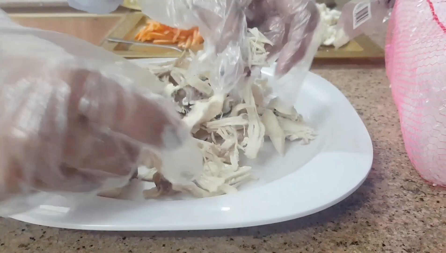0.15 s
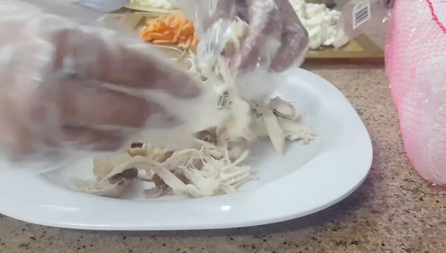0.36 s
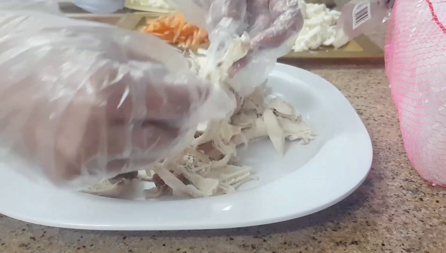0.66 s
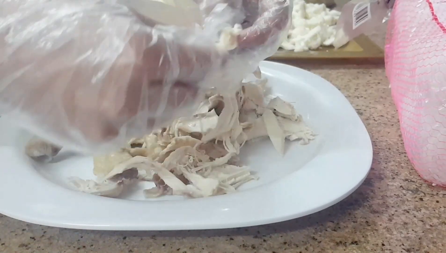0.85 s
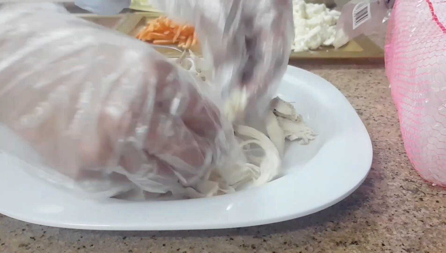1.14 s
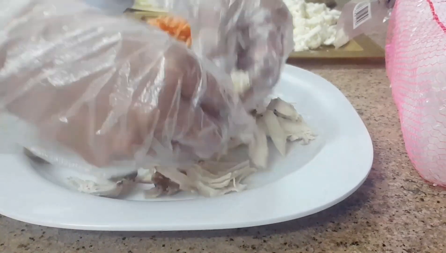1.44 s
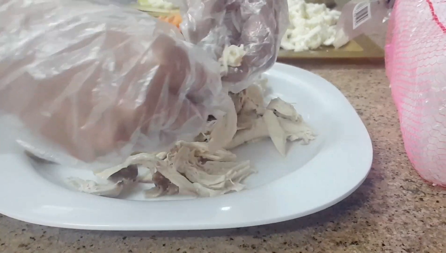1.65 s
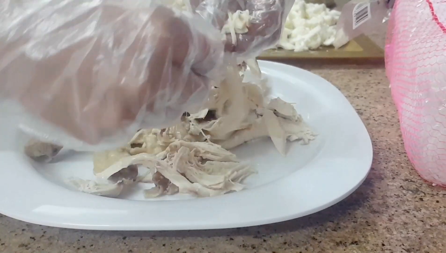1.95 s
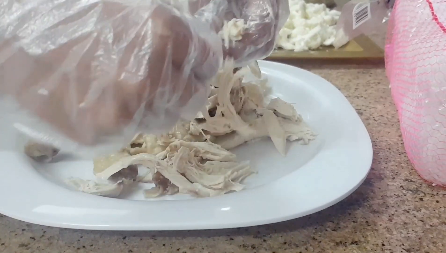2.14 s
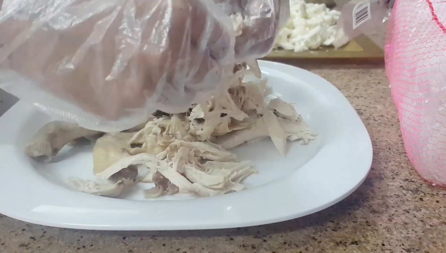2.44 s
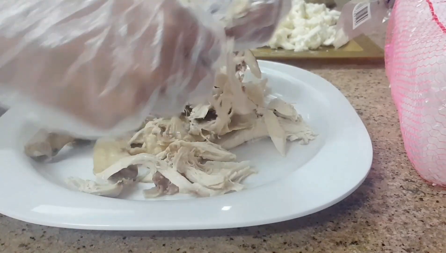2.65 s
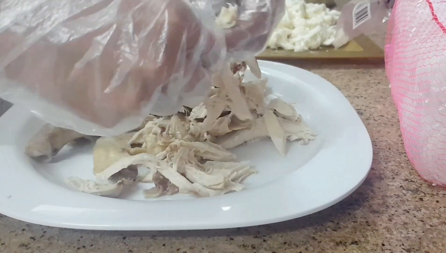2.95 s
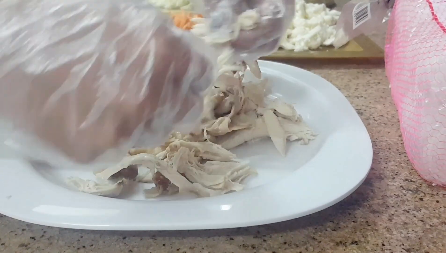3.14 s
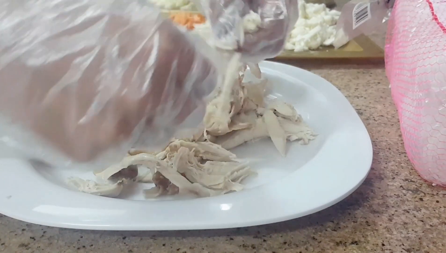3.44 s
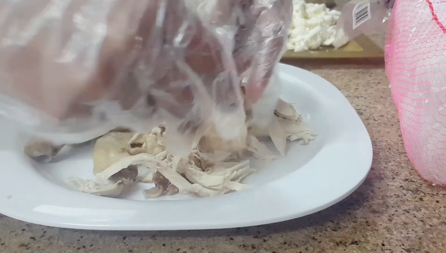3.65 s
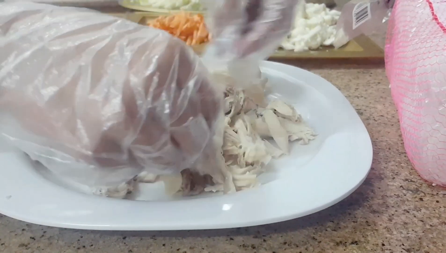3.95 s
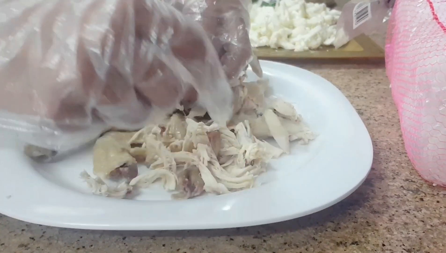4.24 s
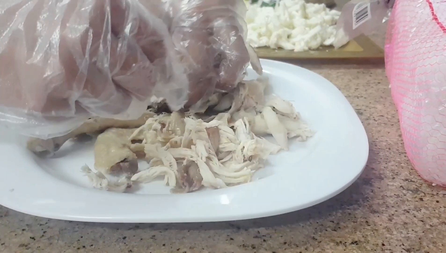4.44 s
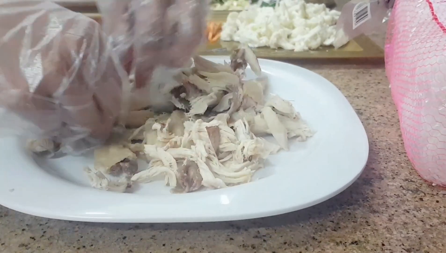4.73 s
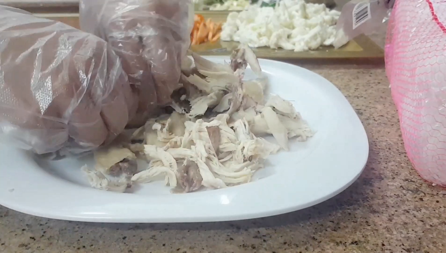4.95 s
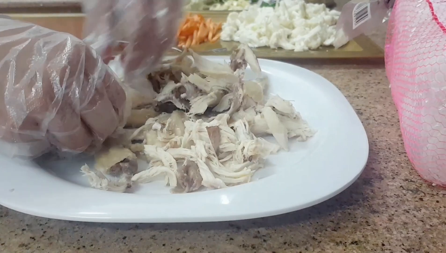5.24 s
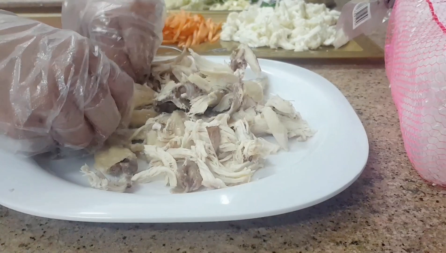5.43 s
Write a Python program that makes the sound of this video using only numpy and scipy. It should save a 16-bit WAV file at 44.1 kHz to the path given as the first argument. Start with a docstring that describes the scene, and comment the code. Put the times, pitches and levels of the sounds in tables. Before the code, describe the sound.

Close stereo pickup in a small hard-walled kitchen: thin plastic gloves crinkle almost continuously in uneven short pulls, with sharper crumples breaking out. Soft, dull rubbing of moist chicken fibres sits underneath. A steady low fridge hum and faint room air run throughout. Near four and a half seconds the dish is knocked, giving a quick cluster of clacks with a short ring, then crinkling continues.

```python
"""Gloved hands pulling cooked chicken apart

Thin plastic film buckles in swarms of tiny random clicks; sharper crumples are denser bursts of them.
Moist fibres rub on the film in duller grains, and a dish is knocked: short clacks and decaying modes.
A fridge hums as a sum of sines, its shaft harmonic beating with the mains; filtered noise is the room air.
Hard kitchen walls scatter every click and clack through decaying noise responses."""
import sys
import numpy as np
from scipy import signal
from scipy.fft import rfft, irfft
from scipy.io import wavfile
from scipy.ndimage import uniform_filter1d

SR = 44100
rng = np.random.default_rng(int(sys.argv[2]) if len(sys.argv) > 2 else 0)


def master_out(mix):
    """Clip the mix to full scale and print it as 16-bit PCM to the path in sys.argv[1]."""
    frames = np.transpose(np.atleast_2d(mix))
    ceiling = np.clip(frames, -1, 1)
    pcm = np.round(ceiling * 32767).astype(np.int16)
    wavfile.write(sys.argv[1], SR, pcm)


N = 246427
T = np.arange(N) / SR  # time [s]

# spectrum of the room air: (frequency [Hz], relative density [dB per Hz])
AIR_SPECTRUM = [(20, -37), (36, -32), (44, -3), (50, 3.5), (57, 0.5), (66, -1), (76, -12), (110, -8),
                (155, -4.5), (200, -13), (260, -15.5), (310, -23), (440, -21.5), (560, -40), (2000, -34.5),
                (15000, -33)]
# likeness of the air noise in the two channels: (frequency [Hz], coherence [0 to 1])
AIR_COHERENCE = [(60, 1), (130, 1), (290, 0.76), (640, 1), (1400, 0), (3000, 0)]
AIR_DB = -47.5  # mean level, before its slow wander

# harmonics of the compressor shaft: (multiple of shaft frequency, steady level [dB rms])
SHAFT_HARMONICS = [(1, -43.3), (2, -53), (3, -67), (5, -68), (6, -77), (7, -70)]
# magnetic buzz: (multiple of mains frequency, level [dB rms])
MAINS_HARMONICS = [(2, -54), (4, -61.5), (6, -69.5)]
# other faint machine tones: (frequency [Hz], level before waver [dB rms])
FAN_TONES = [(45.4, -59), (90.7, -70), (134.3, -57), (206.1, -71.5), (427, -76.5), (721, -85.5)]
SHAFT_HZ, MAINS_HZ = 59.3, 60
BEAT_NULL_S = 0.17  # shaft and mains sines oppose each other here
# the shaft hum is nearly steady; bass air noise close to its pitch makes it seem to waver.
# this chance interplay is drawn as a level curve: a slight random part and one brief cancellation
INTERPLAY_DB, INTERPLAY_PER_S = 0.2, 3.57
CANCEL_S, CANCEL_WIDTH_S, CANCEL_DB = 5.17, 0.044, -12

# a dish slides, bumps and settles: (time [s], relative level [dB], decay constant of the contact [s])
DISH_CONTACTS = [(4.562, -51.5, 0.032), (4.5806, -36, 0.0055), (4.586, -46, 0.0084), (4.607, -45, 0.0055),
                 (4.620, -46, 0.011)]
# resonances of the dish: (frequency [Hz], relative level [dB], t60 [s])
DISH_MODES = [(1024, -8, .2), (1110, -9, 0.17), (1340, -11, 0.18), (1430, -5, .2), (1505, -6, 0.16),
              (1580, -2, 0.21), (1500, -6, 0.24), (2270, -4, .18), (2640, -11, .15), (2600, -14, 0.096),
              (5240, 1, 0.083)]
# spectrum of the contact noise: (frequency [Hz], relative density [dB per Hz])
CONTACT_SPECTRUM = [(200, -17.5), (450, 2.5), (620, -11.5), (1000, -1.5), (1500, 0), (2200, 3.5),
                    (3000, -8), (4400, -4.5), (5500, -4), (9000, -15.5), (15000, -18)]

# spectrum of fibres rubbing on film: (frequency [Hz], relative density [dB per Hz])
RUB_SPECTRUM = [(200, -12), (350, -1.5), (460, 1), (570, -8.5), (850, -8), (1000, 2), (1180, -4.5),
                (1500, -6.5), (1800, -7), (2400, -4.5), (4000, -27)]
# spectrum of the buckling film: (frequency [Hz], relative density [dB per Hz])
FILM_SPECTRUM = [(300, -42.5), (700, -14.5), (1850, -11.5), (2200, -1.5), (2900, -0.5), (3800, -1.25),
                 (5400, 0), (7400, -1), (8400, 1), (9600, -0.9), (11000, -0.6), (12500, -4.5), (13800, -5),
                 (15000, -14.5)]
# sudden crumples of the film: (time [s], relative level [dB], decay constant [s])
CRUMPLE_EVENTS = [(0.308, -45, 0.014), (0.601, -38, .012), (0.748, -42, .013), (.817, -36, 0.011),
                  (1.057, -35.5, .018), (1.318, -44, 0.022), (1.401, -38.5, 0.022), (1.661, -37, .013),
                  (1.973, -38.5, 0.013), (2.126, -40.5, 0.02), (2.656, -32.5, 0.012), (2.703, -42, .013),
                  (2.782, -42.5, 0.022), (2.962, -36, 0.011), (3.202, -39.5, 0.019), (3.531, -38, 0.021),
                  (4.096, -42, 0.025), (4.583, -40.5, 0.025), (5.067, -41, 0.017)]
CRUMPLE_RUB_DB = -15  # the meat gives a little under each crumple
# pulls of the fingers: (start time [s], length before release [s], relative crinkle level [dB],
# duller rubbing relative to that crinkle level [dB])
FINGER_PULLS = [(-.05, 0.049, -48, -6), (0.043, 0.34, -49, -11.5), (0.272, 0.19, -49, -12.5),
                (0.459, .115, -48, -10), (0.545, 0.08, -41, -14), (0.678, 0.18, -43, -12),
                (0.867, 0.044, -50.5, -9), (0.952, .05, -48, -12.5), (1.018, 0.16, -47.5, -13.5),
                (1.228, 0.24, -56.5, -7), (1.41, 0.15, -43, -12.5), (1.58, 0.21, -47.7, -15),
                (1.817, .16, -51, -14), (2.044, 0.081, -52, -16), (2.2, .155, -53.5, -12.5),
                (2.378, 0.082, -51.5, -17), (2.531, 0.09, -50, -20), (2.663, .15, -47.5, -12.5),
                (2.872, 0.2, -51, -16), (3.121, .11, -48, -10), (3.247, 0.11, -50, -12.5),
                (3.429, 0.23, -49, -15.5), (3.722, 0.15, -45.5, -15), (3.894, 0.15, -52, -14),
                (4.059, 0.11, -45, -13.5), (4.185, 0.089, -49, -9.5), (4.265, 0.16, -46, -11.5),
                (4.463, .39, -52, -13), (4.86, 0.24, -47, -12), (5.113, .05, -52, -8.5),
                (5.156, 0.14, -49, -12), (5.366, .2, -49, -9.5)]
# every pull tightens, holds while the fibres give way, then slackens
ATTACK_S, SAG_DB_PER_S, RELEASE_S = 0.049, 3, 0.05
GRIP_SLIP_DB, GRIP_SLIP_PER_S = 0.5, 30  # the fingers catch and slip within a pull

# the two microphones differ in colour: (frequency [Hz], left minus right [dB])
MICROPHONE_DIFFERENCE = [(60, -0.5), (120, 0.1), (200, -4), (400, 0), (700, 7.5), (1250, -4), (2300, 2),
                         (4200, -0.8), (8000, -2.5), (14000, 0)]
TOP_HZ = 15250  # edge of the final low-pass


def undb(db):
    """Definition of the decibel: amplitude gain is ten to the power dB / 20."""
    return 10 ** (np.asarray(db) / 20)


def to_db(gain):
    """Inverse of the decibel law, with a small floor to keep the logarithm finite."""
    return 20 * np.log10(gain + 1e-9)


def unit(x):
    """Normalisation: division by the root mean square gives rms 1."""
    return x / np.sqrt(np.mean(x ** 2))


def on_log_axis(points, size):
    """Interpolation over log frequency: (Hz, value) points read at the bins of a transform."""
    hz, value = np.transpose(points)
    bin_hz = np.arange(size // 2 + 1) * SR / size
    return np.interp(np.log(bin_hz + 1), np.log(hz), value)


def colour(x, points):
    """Minimum-phase filtering: folding the cepstrum makes a causal response of the given (Hz, dB) shape."""
    cepstrum = irfft(np.log(undb(on_log_axis(points, size=16384))))
    half = len(cepstrum) // 2
    cepstrum[1:half] *= 2
    cepstrum[half + 1:] = 0
    response = irfft(np.exp(rfft(cepstrum)))[:half]
    return signal.fftconvolve(x, response)[:N]


def walk(rate):
    """Slow random modulation: held random values, smoothed twice, with rms 1."""
    hold = max(int(SR / rate), 1)
    held = np.repeat(rng.standard_normal(N // hold + 1), hold)
    smooth = uniform_filter1d(uniform_filter1d(held, hold), hold)
    return unit(smooth[:N])


def clicks(per_s, spread_db):
    """Random impulse train: mostly small clicks and a few large, scaled to rms 1 whatever their rate."""
    share = np.clip(per_s / SR, 1e-4, 1)  # chance of a click at each sample
    size = undb(spread_db * np.minimum(rng.exponential(size=N), 5))
    sign = rng.choice([-1, 1], N)
    struck = rng.random(N) < share
    return unit(struck * size * sign / np.sqrt(share))


def kitchen(x, direct_db, near_s, tail_db, t60_s):
    """Room response: direct sound, quick reflections off plate and counter, and the ring of the walls."""
    t = T[:SR // 2]
    channels = []
    for lag in (0, 4):  # delay of the direct sound [samples], left and right
        near = rng.standard_normal(len(t)) * np.exp(-t / near_s)
        decay = np.exp(-np.log(1000) * t / t60_s)
        build_up = 1 - np.exp(-t / 0.004)
        tail = rng.standard_normal(len(t)) * decay * build_up
        response = near / np.linalg.norm(near) + undb(tail_db) * tail / np.linalg.norm(tail)
        response[lag] += undb(direct_db)
        # reflections arrive from all sides, so no broad band is favoured
        spectrum = rfft(response)
        spectrum /= np.sqrt(uniform_filter1d(np.abs(spectrum) ** 2, size=200))
        channels.append(signal.fftconvolve(x, irfft(spectrum))[:N])
    return np.array(channels)


def pan(x, db):
    """Interchannel level difference: the left is raised over the right by db."""
    return x * undb(np.array([[db], [-db]]) / 2)


def air():
    """Partly coherent noise: rumble of moving air and a faint hiss, the bass alike in both channels."""
    mid = rfft(colour(rng.standard_normal(N), AIR_SPECTRUM))
    side = rfft(colour(rng.standard_normal(N), AIR_SPECTRUM))
    coherence = np.clip(on_log_axis(AIR_COHERENCE, size=N), 0, 1)
    mid = irfft(mid * np.sqrt(1 + coherence), N)
    side = irfft(side * np.sqrt(1 - coherence), N)
    noise = unit(np.array([mid + side, mid - side]))
    return pan(noise, db=-1.4) * undb(AIR_DB + 0.54 * walk(2.83))


def fridge(fan_waver_db=2.0):
    """Beating: the motor slips just behind the mains, so its second harmonic beats with the magnetic buzz."""
    turn = 2 * np.pi * (T - BEAT_NULL_S)
    cancel_db = CANCEL_DB * np.exp(-((T - CANCEL_S) / CANCEL_WIDTH_S) ** 2)
    interplay = undb(INTERPLAY_DB * walk(INTERPLAY_PER_S) + cancel_db)
    shaft = sum(undb(db) * np.sin(k * SHAFT_HZ * turn) for k, db in SHAFT_HARMONICS) * interplay
    buzz = -sum(undb(db) * np.sin(k * MAINS_HZ * turn) for k, db in MAINS_HARMONICS)
    fan = 0
    for hz, db in FAN_TONES:
        level = undb(db + fan_waver_db * walk(3.15))
        fan = fan + level * np.sin(hz * turn + 0.47 * walk(4.6))
    return pan(np.sqrt(2) * (shaft + buzz + fan), db=0.6)  # root 2 turns rms into peak


def dish(ring_db=-3.5, rise_s=0.0008):
    """Modal excitation: each contact gives a short clack that echoes round the kitchen, and rings the dish."""
    t = T[:SR // 2]
    clack, ring = np.zeros(N), np.zeros((2, N))
    noise = unit(colour(rng.standard_normal(N), CONTACT_SPECTRUM))
    for start, db, length in DISH_CONTACTS:
        first = int(start * SR)
        span = slice(first, first + len(t))
        push = undb(db) * (1 - np.exp(-t / rise_s))
        clack[span] += push * noise[span] * np.exp(-t / length)
        for hz, mode_db, t60 in DISH_MODES:
            phase = 2 * np.pi * rng.random((2, 1))
            decay = np.exp(-np.log(1000) * t / t60)
            ring[:, span] += push * undb(mode_db) * np.sin(2 * np.pi * hz * t + phase) * decay
    echoed = kitchen(clack, direct_db=1.5, near_s=0.002, tail_db=-5.0, t60_s=0.42)
    return echoed * undb(8.0) + undb(ring_db) * ring


def swarm(level_db, per_s, spread_db, clump_db, shape, direct_db, near_s, tail_db, t60_s, count):
    """Superposition: clumped clicks from several places on the hands, each with its own reflections."""
    total = 0
    for _ in range(count):
        clumps = unit(clicks(per_s / count, spread_db) * undb(clump_db * walk(110)))
        total = total + kitchen(clumps * undb(level_db), direct_db, near_s, tail_db, t60_s)
    power = np.mean(undb(on_log_axis(shape, size=4096)) ** 2)
    coloured = np.array([colour(channel, shape) for channel in total])
    return coloured / np.sqrt(count * power)


def pull(start, length):
    """Envelope of one pull's vigour: linear attack, slowly sagging hold, exponential release."""
    age = np.maximum(T - start, 0)
    attack = np.minimum(age / ATTACK_S, 1)
    hold = undb(-SAG_DB_PER_S * np.minimum(age, length))
    release = np.exp(-np.maximum(age - length, 0) / RELEASE_S)
    return attack * hold * release


def creases(rise_s=0.0074):
    """Sudden collapse: a crease gives way all at once and its clicks die out exponentially."""
    envelope = 0
    for start, db, length in CRUMPLE_EVENTS:
        age = np.maximum(T - start, 0)
        envelope = envelope + undb(db) * (1 - np.exp(-age / rise_s)) * np.exp(-age / length)
    return envelope


def meat(level_db):
    """Frictional grains: moist fibres tear and rub on the film, duller and softer than its clicks."""
    grains = swarm(level_db, per_s=1900, spread_db=3.0, clump_db=2.76, shape=RUB_SPECTRUM,
                   direct_db=-2, near_s=0.001, tail_db=0.5, t60_s=0.13, count=4)
    return pan(grains, db=-1.5) * undb(5)


def crumples(level_db):
    """Dense buckling: the close, dry clicks of collapsing creases."""
    burst = swarm(level_db, per_s=4600, spread_db=2.5, clump_db=1.5, shape=FILM_SPECTRUM,
                  direct_db=-5.5, near_s=0.0031, tail_db=-19, t60_s=0.069, count=3)
    return pan(burst, db=-1.0) * undb(4.5)


def gloves(level_db, clicks_per_s=3400, rate_slope=0.56):
    """Buckling of thin film: folds snap over, and faster movement sets off more clicks."""
    rate = clicks_per_s * undb(rate_slope * (level_db - np.mean(level_db)))
    crinkle = swarm(level_db, rate, spread_db=2.5, clump_db=3.02, shape=FILM_SPECTRUM,
                    direct_db=-4.5, near_s=0.0012, tail_db=0.5, t60_s=0.1, count=7)
    return pan(crinkle, db=0.0) * undb(3.5)


def scene(rest_db=-60, rub_rest_db=-77):
    """Common drive: each pull moves film and meat together, and the gloves never lie quite still."""
    collapse = creases()
    grip_db = GRIP_SLIP_DB * walk(GRIP_SLIP_PER_S)
    crinkle = undb(rest_db)
    rubbing = np.hypot(undb(rub_rest_db), collapse * undb(CRUMPLE_RUB_DB))
    for start, length, db, rub_db in FINGER_PULLS:
        vigour = undb(db + grip_db) * pull(start, length)
        crinkle = np.hypot(crinkle, vigour)  # powers add
        rubbing = np.hypot(rubbing, vigour * undb(rub_db))
    background = air() + fridge() + dish()
    return background + meat(to_db(rubbing)) + crumples(to_db(collapse)) + gloves(to_db(crinkle))


def record(dry):
    """Linear filtering: each microphone adds its own colour, then an elliptic low-pass cuts the top."""
    lean = undb(on_log_axis(MICROPHONE_DIFFERENCE, size=N) / 2)
    heard = irfft(rfft(dry) * np.array([lean, 1 / lean]), N)
    low_pass = signal.ellip(10, 0.2, 80, TOP_HZ, fs=SR, output="sos")
    return signal.sosfilt(low_pass, heard)


dry = scene()
out = record(dry)
master_out(out)
```